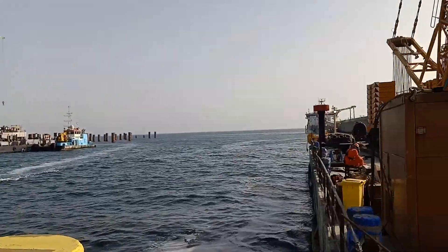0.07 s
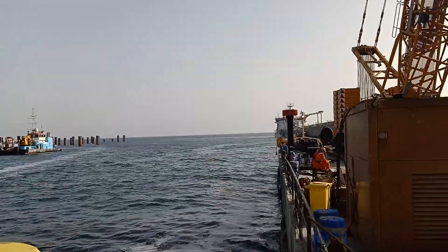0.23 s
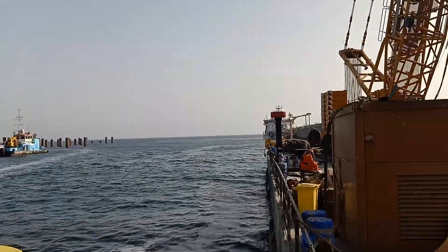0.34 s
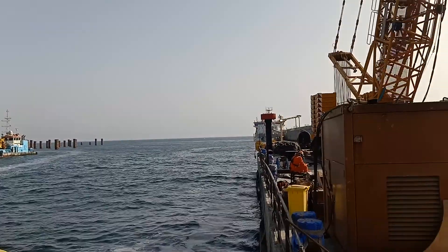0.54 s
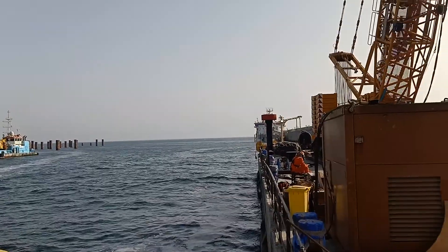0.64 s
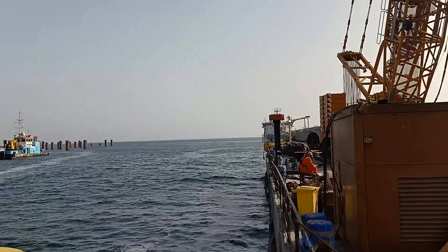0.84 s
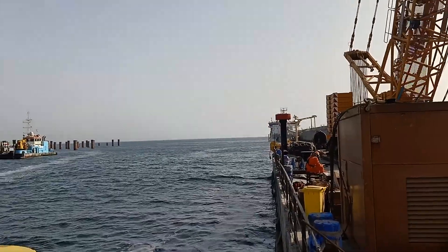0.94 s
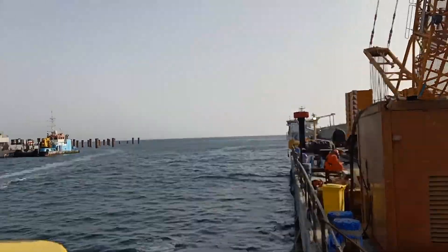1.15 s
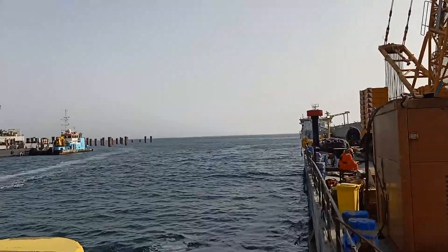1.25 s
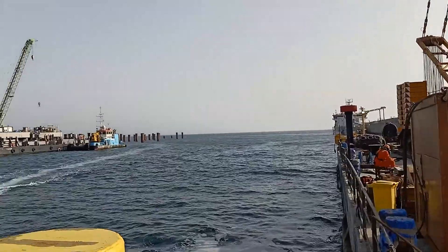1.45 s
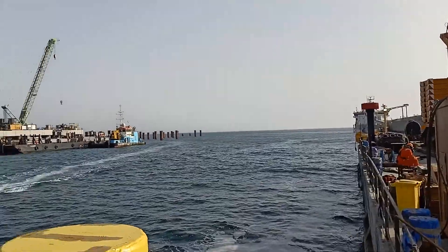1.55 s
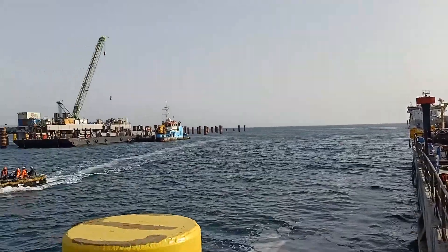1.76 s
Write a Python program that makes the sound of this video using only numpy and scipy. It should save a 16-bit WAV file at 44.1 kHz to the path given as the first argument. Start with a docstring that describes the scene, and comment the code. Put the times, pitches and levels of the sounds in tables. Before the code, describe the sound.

A loud ringing steel clang follows a deep hull boom on a vessel at sea.

```python
"""On the deck of a steel work vessel at sea, stereo microphone in the open: an engine drones, wind buffets
the microphone and water washes along the side. Small dull knocks sound close on the left, then a heavy
boom rolls through the hull and loose fittings clack. At 0.8 s steel strikes steel nearby, rebounds and
rings out. Rubbing metal squeaks thinly and the small knocks return as the ring dies away."""
import sys
import numpy as np
from scipy import signal
from scipy.fft import rfft, irfft
from scipy.io import wavfile

SR = 44100
rng = np.random.default_rng(int(sys.argv[2]) if len(sys.argv) > 2 else 0)


def wrap_up_sound(samples):
    """Save the sound to the file named by the first command line argument, as 16-bit audio."""
    columns = np.atleast_2d(samples).T
    # keep every value between -1 and 1, then stretch to whole-number steps
    tamed = np.clip(columns, -1, 1)
    steps = np.round(tamed * 32767).astype(np.int16)
    wavfile.write(sys.argv[1], SR, steps)


N = 79380
CONTACT_S = .0016  # rise of a hard metal contact

# Balance at the microphone: frequency_hz, left_minus_right_db
MIC_BALANCE = [(60, 5), (170, 1), (500, 0), (850, 4.5), (1150, -3), (1450, -2.5), (2500, -5), (4200, -2),
               (7000, -2)]
# Stereo width of the sounding metal: frequency_hz, side_to_mid_ratio
METAL_WIDTH = [(60, 0.27), (180, 0.17), (400, .35), (900, 1), (2000, 0.53), (4000, 0.8), (7000, 0.99)]


def undb(db):
    return 10 ** (np.asarray(db) / 20)


def at(points, hz):
    """Read a table on a log-frequency axis."""
    p = np.array(points, float)
    return np.interp(np.log(np.maximum(hz, 1)), np.log(p[:, 0]), p[:, 1])


def unit_rms(x):
    return x / np.sqrt(np.mean(x ** 2))


def since(start):
    """Seconds since a moment, zero before it."""
    return np.maximum(np.arange(N) / SR - start, 0)


def fade(age, t60):
    return np.exp(-np.log(1000) * age / t60)


def rise(age, length):
    return np.sin(np.pi / 2 * np.minimum(age / length, 1))


def pan(left_db):
    return undb(np.array([[.5], [-.5]]) * left_db)


def freqs():
    return np.arange(N // 2 + 1) * SR / N


def wander(rate_hz):
    """Smooth random motion of unit RMS."""
    return unit_rms(irfft(rfft(rng.standard_normal(N)) * np.exp(-(freqs() / rate_hz) ** 2), N))


def wavering_tone(hz, depth, rate_hz):
    """A sine whose pitch strays by the fraction `depth`."""
    return np.sin(2 * np.pi * np.cumsum(hz * (1 + depth * wander(rate_hz))) / SR)


def noise(colour, width):
    """Coloured stereo noise of unit RMS; width rows are frequency_hz, side_to_mid_ratio."""
    mid, side = rfft(rng.standard_normal((2, N)))
    stereo = mid + at(width, freqs()) * side * np.array([[1], [-1]])
    return unit_rms(irfft(stereo * undb(at(colour, freqs())), N))


def microphone(x, lag_above_hz=520):
    """Each band has its own left-right balance, and the treble reaches the right side 0.5 ms late."""
    f = freqs()
    lag_s = .0005 * (1 - 1 / (1 + (f / lag_above_hz) ** 4))
    delay = np.exp(-2j * np.pi * f * lag_s * np.array([[0], [1]]))
    return irfft(rfft(x) * pan(at(MIC_BALANCE, f)) * delay, N)


def low_cut(x, hz):
    """Small objects radiate little bass."""
    return signal.sosfilt(signal.butter(2, hz, "high", fs=SR, output="sos"), x)


def ring(modes, start, ratio=1):
    """Damped modes set off at one moment."""
    age = since(start)
    partials = (undb(db) * fade(age, t60) * np.sin(2 * np.pi * hz * ratio * age) for hz, db, t60 in modes)
    return rise(age, 2 / SR) * sum(partials)


def long_ring(modes, blows):
    """Lasting modes gather the energy of every blow (start_s, level_db, build_s), then die away."""
    feed = sum(undb(db) ** 2 * np.diff(rise(since(s), build) ** 2, prepend=0) for s, db, build in blows)
    out = 0
    for hz, db, t60 in modes:
        energy = signal.lfilter([1], [1, -fade(1 / SR, t60) ** 2], feed)
        out += undb(db) * np.sqrt(np.abs(energy)) * np.sin(2 * np.pi * (hz * since(0) + rng.random()))
    return out


def dense_ring(colour, t60s, blows):
    """Countless plate modes: half-octave noise bands that each blow builds up, each with its own decay."""
    spectrum = rfft(noise(colour, METAL_WIDTH)) / np.sqrt(1 + (freqs() / 6800) ** 30)
    bin_octave = np.log2(np.clip(freqs(), 50, 6400) / 50)
    out = 0
    for octave in np.arange(15) / 2:
        band = irfft(spectrum * np.maximum(1 - 2 * abs(bin_octave - octave), 0), N)
        t60 = at(t60s, 50 * 2 ** octave)
        power = 0
        for start, db, build, tilt in blows:
            gain = undb(db + tilt * max(octave - 2, 0))  # tilted above 200 Hz
            power += (gain * rise(since(start), build) * fade(since(start), t60)) ** 2
        out += np.sqrt(power) * band
    return out


def sea_rush():
    """Machinery and sea merge into a steady rush around the deck."""
    # Spectrum of the rush: frequency_hz, density_db
    colour = [(15, -58.5), (25, -32), (103, -2), (161, -8.5), (191, -9.5), (294, -3), (323, -5), (441, -9),
              (631, -16), (882, -14), (1070, -18), (1260, -18.5), (1490, -26.5), (2140, -23), (2350, -25),
              (2710, -22), (3290, -33), (5700, -34), (7590, -44.5), (9870, -115.5), (16700, -120)]
    width = [(60, .67), (180, .74), (500, .55), (2000, .55), (6000, .6)]
    return microphone(undb(-44 + .5 * wander(6.3)) * noise(colour, width), lag_above_hz=750)


def water():
    """Water washes along the side in soft swells of flickering spray."""
    # Washes: crest_s, half_width_s, level_db
    washes = [(0.379, 0.13, -53.5), (.73, 0.17, -50), (1.49, 0.16, -56.5)]
    # Hiss of spray: frequency_hz, density_db
    colour = [(800, -1), (2500, 10.5), (4500, -7.5), (6200, 3.5), (7200, -14.5), (8500, -28), (15000, -41)]
    swells = sum(undb(db) * np.exp(-((since(0) - crest) / half) ** 2) for crest, half, db in washes)
    return swells * undb(2.2 * wander(66)) * noise(colour, width=[(1000, .93)])


def wind():
    """Gusts buffet the microphone, harder on the left."""
    # Wind rumble: frequency_hz, density_db
    colour = [(20, -36.5), (45, -9), (80, 5), (130, 16), (300, 10), (1000, -54)]
    return undb(-46 + wander(11)) * pan(left_db=5.5) * noise(colour, width=[(100, .43)])


def engine(flutter_db=2):
    """The engine drones on low tones that waver in pitch and strength."""
    # Engine tones: pitch_hz, level_db
    tones = [(76, -57), (110, -50), (146, -59), (184, -45.5), (262, -50)]
    return sum(undb(db + flutter_db * wander(3.7)) * wavering_tone(hz, .014, 13) for hz, db in tones)


def dull_knocks():
    """Soft knocks on something well damped, close to the left of the microphone."""
    # Knocks: start_s, level_db, pitch_ratio
    taps = [(0.193, -27, 0.94), (.203, -21.5, 0.87), (0.223, -26, 1.1), (.247, -25, 1.16),
            (0.265, -23, 0.38), (1.385, -29, 0.67), (1.472, -23, 0.85), (1.481, -24.5, 0.86),
            (1.646, -27.5, 0.5), (1.746, -24.5, 1.027)]
    # Modes of the damped object: pitch_hz, level_db, t60_s
    modes = [(116, -10.5, 0.083), (192, -5, 0.069), (321, 4, 0.019), (486, -13, 0.056), (844, -18, 0.025)]
    knocks = sum(undb(db) * rise(since(s), .004) * ring(modes, s, ratio) for s, db, ratio in taps)
    return pan(left_db=13) * low_cut(knocks, 90)


def squeaks(flutter_db=1.2):
    """Rubbing metal sings up on one thin note and rings away."""
    # Squeaks: start_s, build_s, t60_s, pitch_hz, level_db
    notes = [(1.106, 0.035, 0.7, 1965, -41.5), (1.677, 0.023, 0.11, 2790, -56)]
    out = 0
    for start, build, t60, hz, db in notes:
        envelope = rise(since(start), build) * fade(since(start + build), t60)
        out += envelope * undb(db + flutter_db * wander(30)) * wavering_tone(hz, .0012, 86)
    return microphone(out)


def hull_thuds():
    """Heavy thuds spread through the plating, juddering, and set the hull's modes ringing."""
    # Blows to the hull: start_s, level_db, build_s, tilt_db_per_octave
    thuds = [(0.341, -33, 0.0049, -5), (0.35, -30, 0.0036, -0.5), (.366, -32, 0.066, 1.1),
             (0.392, -37, 0.00098, 0.6), (0.457, -28.5, 0.0094, -1.86), (0.546, -40.5, 0.016, -14.5)]
    # Spectrum of the plating: frequency_hz, density_db
    colour = [(45, -41), (80, -17.5), (120, -6), (180, -7.5), (240, -1.5), (300, -9.5), (400, -9.5),
              (530, -14.5), (680, -5.5), (830, -15), (1100, -16.5), (1600, -20.5), (2800, -25.5),
              (4400, -43), (6000, -45), (7000, -52)]
    # Decay of the plating: frequency_hz, t60_s
    decay = [(80, 1.5), (200, 2.3), (600, 1.5), (1500, 1.01), (3000, 0.94), (7000, 0.3)]
    # Hull modes: pitch_hz, level_db, t60_s
    modes = [(117.5, -9.5, 3.5), (148, -6.5, 2), (238.2, 0.5, 1.3), (322.6, -5.5, 2.5), (376, -7.5, 2.3),
             (433.4, -8.5, 2.3), (464, -14.5, 0.98), (566, -9.5, 0.94), (648, -8, 1), (705, -11, 0.85)]
    plating = dense_ring(colour, decay, thuds) * undb(wander(78))
    first_db = thuds[0][1]
    blows = [(start, db - first_db, build) for start, db, build, _ in thuds]
    return plating + undb(-38) * long_ring(modes, blows)


def hull_boom(flutter_db=1.4):
    """The plating swells on a deep, unsteady note."""
    # Swells: start_s, level_db, pitch_hz, build_s, t60_s
    swells = [(0.353, -15.5, 182, 0.07, 0.48), (0.523, -20, 191, 0.073, 0.94)]
    out = 0
    for start, db, hz, build, t60 in swells:
        envelope = rise(since(start), build) * fade(since(start), t60)
        out += envelope * undb(db + flutter_db * wander(25)) * wavering_tone(hz, .011, 21)
    return out


def loose_fittings():
    """Loose fittings clack as the hull shakes."""
    # Clacks: start_s, level_db
    clacks = [(.352, -32), (.357, -30), (.3915, -25), (.414, -31), (.433, -29), (.444, -33), (.462, -30),
              (.501, -29)]
    # Spectrum of a clack: frequency_hz, density_db
    colour = [(200, -22), (450, 5.5), (700, -2), (1300, -7.5), (1800, -17.5), (3000, -17.5), (4300, -42.5),
              (7000, -64.5), (9000, -84)]
    envelope = sum(undb(db) * rise(since(s), CONTACT_S) * fade(since(s), t60=.04) for s, db in clacks)
    return envelope * noise(colour, METAL_WIDTH)


def steel_strike():
    """Steel hits and rebounds nearby; each contact knocks, pings, thumps, rattles and feeds the ring."""
    # Contacts: start_s, knock_db, thump_db, ring_db, rattle_db, ping_db, ping_hz
    strikes = [(.8047, -4, 0, -12, -36, -29, 2200), (.8074, 2.5, -15, -3, -30, -29, 2170),
               (.8255, -20, -8, -16, -33, -42, 2100), (.8365, -15, -22, -13, -30, -40, 2050),
               (.8435, -18, -12, -13, -29, -33, 2200), (.8555, -24, -12, -20, -35, -35, 1950),
               (.872, -11, -20, -5, -26, -38, 2100), (.875, -15, -26, -8, -32, -23, 1965),
               (.8835, -7, -6, -4, -25, -35, 2100), (.902, -12, -18, -12, -30, -31, 1920),
               (.938, -19, -16, -16, -32, -37, 2050), (.974, -26, -20, -17, -36, -32, 2010)]
    # Knock at the point of contact: pitch_hz, level_db, t60_s
    knock_modes = [(690, -3, .011), (800, -2.5, .012)]
    # Dull thump of the plate beneath: pitch_hz, level_db, t60_s
    thump_modes = [(232, -11, .026), (285, -9, .024)]
    # Long modes of the steelwork: pitch_hz, level_db, t60_s
    steel_modes = [(147.6, -2.5, 0.87), (186.8, -5.5, 3.04), (239.2, -4, 0.62), (326, -9, 2),
                   (377, -16, 4.8), (494.4, -12, 4.04), (675, -12.5, 2.2), (720.5, -2.5, 1.22),
                   (735, -3.5, 1.2), (795, 1.5, 0.34), (904, 7, 0.84), (947, 0, 1.0), (988, 5, 0.81),
                   (1466, -12.5, 1.2), (1710, -13, 1.1), (1820, -16, 0.71), (1966, -14, 2.1),
                   (2068, -13.5, 0.53), (2160, -14.5, 0.54)]
    # Spectrum of the clang: frequency_hz, density_db
    clang_colour = [(35, -50), (60, -23.5), (93, 1.5), (141, 3), (242, 3), (333, -3), (450, -14),
                    (593, -3.5), (800, -6.5), (940, 1.5), (1100, -11), (1290, -17), (2000, -7), (2250, -13),
                    (3220, -16.5), (4430, -41.5), (5970, -36.5), (7000, -37.5), (9100, -91), (15400, -120)]
    # Decay of the clang: frequency_hz, t60_s
    clang_decay = [(80, 0.35), (250, 1.98), (500, 2.87), (900, 1.47), (2000, 1.37), (3200, 1), (7000, 2.5)]
    # Rattle of loose steel: frequency_hz, density_db
    rattle_colour = [(100, -25.5), (250, -16.5), (500, -20.5), (850, 8.5), (1500, -30.5), (2100, -18),
                     (3000, -15), (4400, -35.5), (5700, -21.5), (7000, -58.5), (9000, -46.5)]
    contacts, rattle_envelope, blows = 0, 0, []
    for start, knock_db, thump_db, ring_db, rattle_db, ping_db, ping_hz in strikes:
        age = since(start)
        knock = undb(knock_db) * ring(knock_modes, start)
        ping = ring([(ping_hz, ping_db, .04)], start)
        thump = undb(thump_db) * rise(age, .0045) ** 2 * ring(thump_modes, start)
        contacts += low_cut(rise(age, CONTACT_S) ** 2 * (knock + ping), 520) + thump
        rattle_envelope += undb(rattle_db) * rise(age, .0003) * fade(age, t60=.055)
        blows.append((start, ring_db, .0025))
    clang = undb(-28.5) * dense_ring(clang_colour, clang_decay, [(*blow, 0) for blow in blows])
    tones = low_cut(contacts + undb(-32) * long_ring(steel_modes, blows), 116)
    rattle = rattle_envelope * noise(rattle_colour, METAL_WIDTH)
    low_pass = signal.butter(6, 7200, fs=SR, output="sos")
    return microphone(signal.sosfilt(low_pass, clang + tones + rattle))


def scene():
    """Hull, steelwork and open sea from one spot on deck."""
    hull = microphone(hull_thuds() + hull_boom() + loose_fittings(), lag_above_hz=1270)
    return hull + steel_strike() + squeaks() + dull_knocks() + engine() + sea_rush() + water() + wind()


def record(dry):
    """The microphone chain cuts off steeply above 15.4 kHz."""
    return signal.sosfilt(signal.ellip(8, .2, 70, 15400, fs=SR, output="sos"), dry)


dry = scene()
out = record(dry)
wrap_up_sound(out)
```